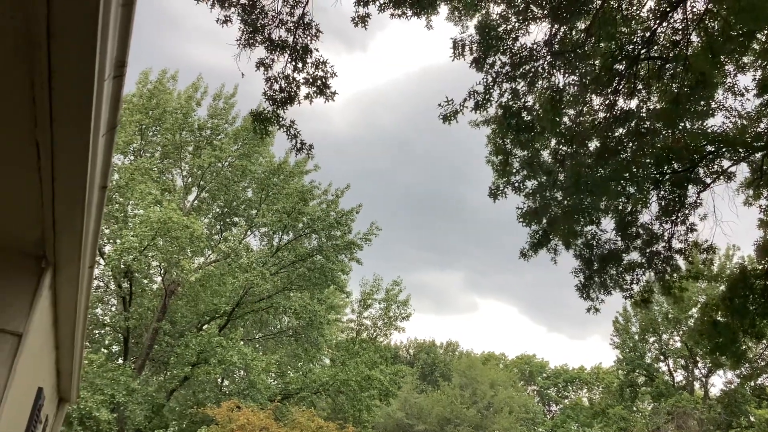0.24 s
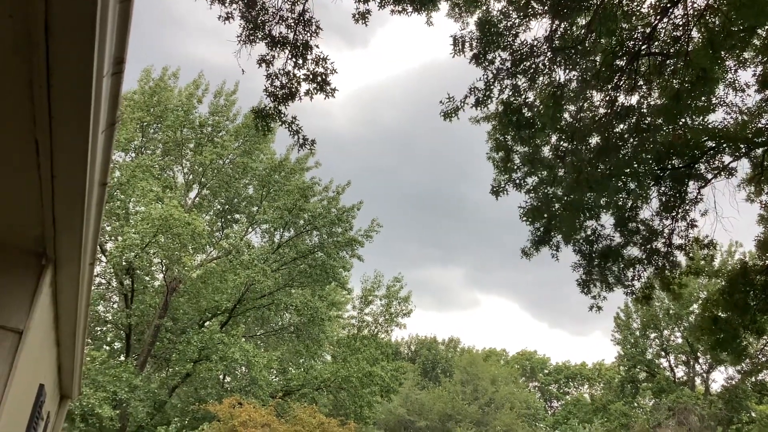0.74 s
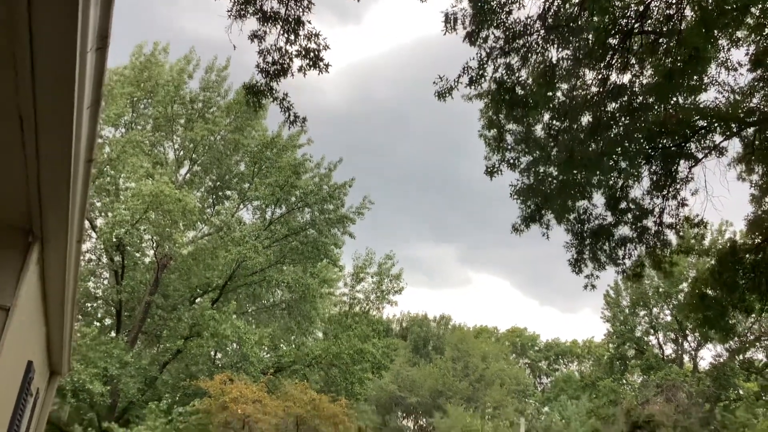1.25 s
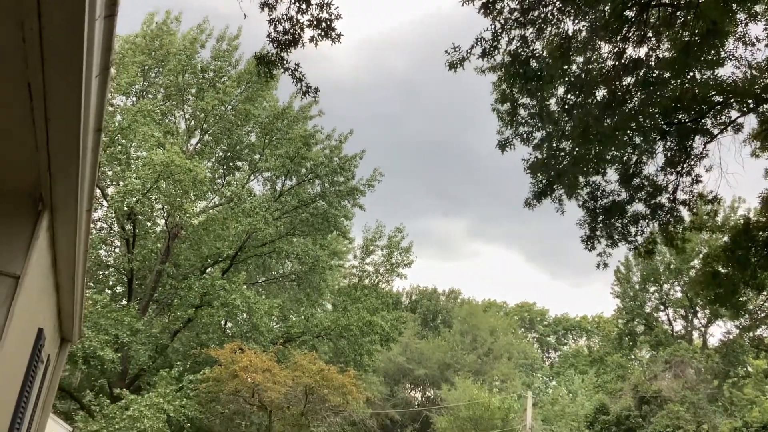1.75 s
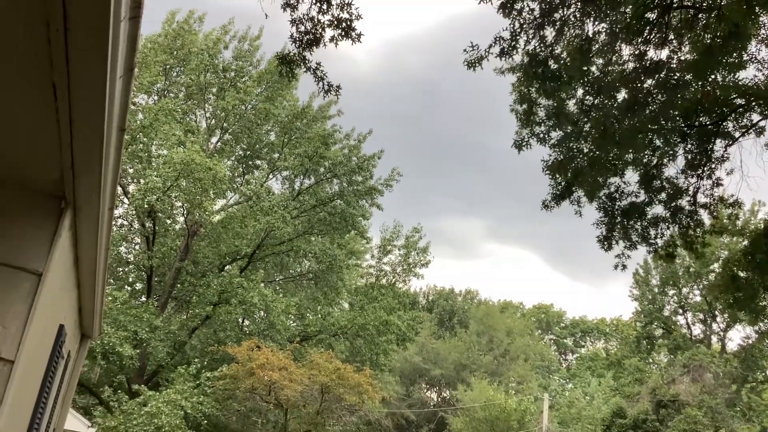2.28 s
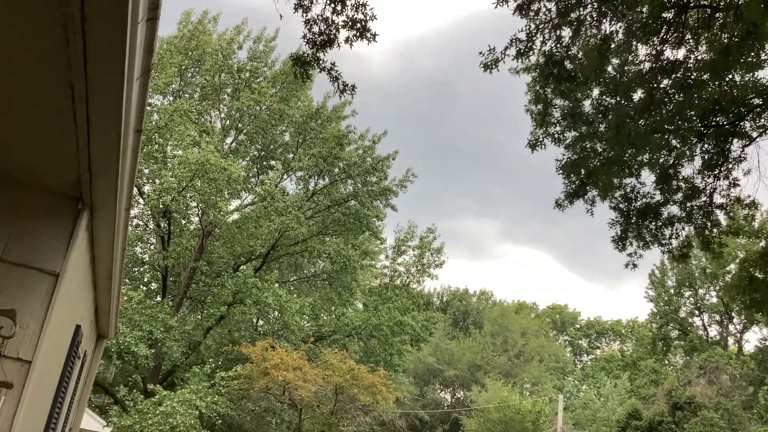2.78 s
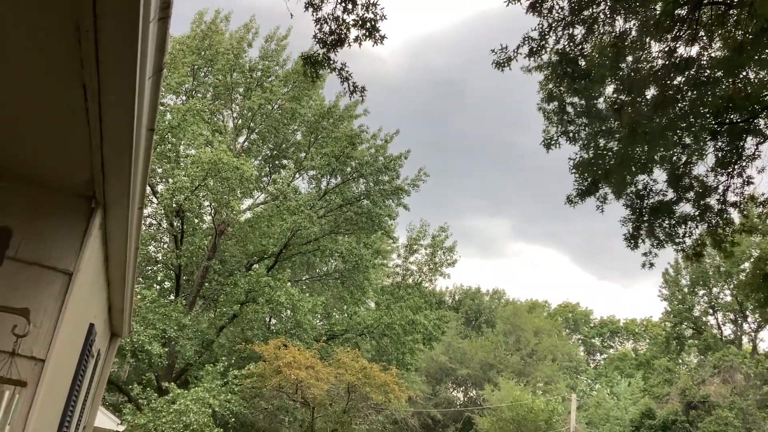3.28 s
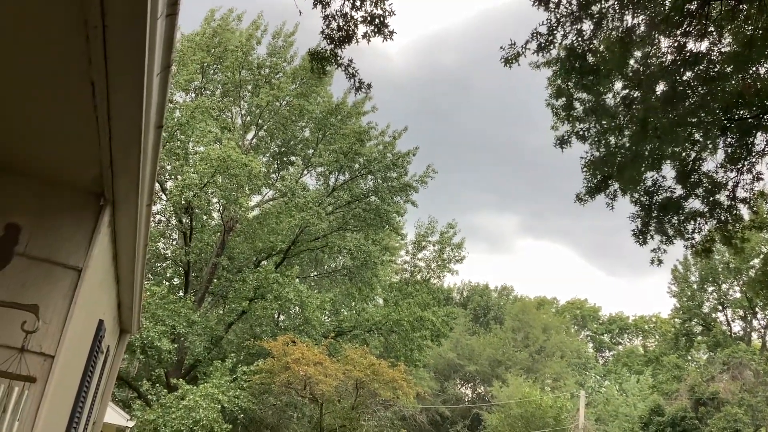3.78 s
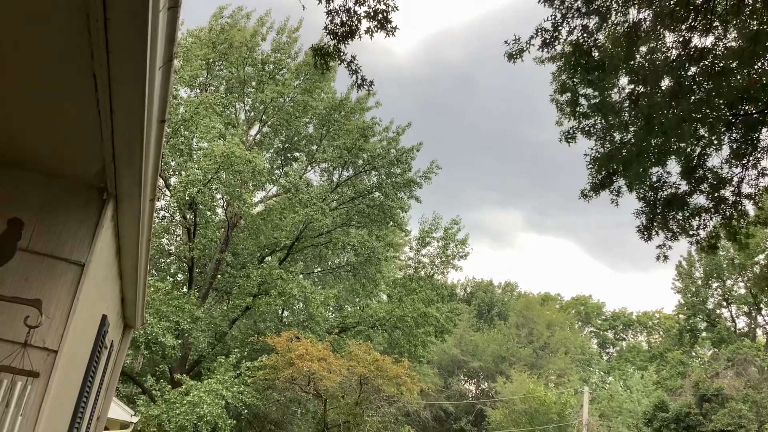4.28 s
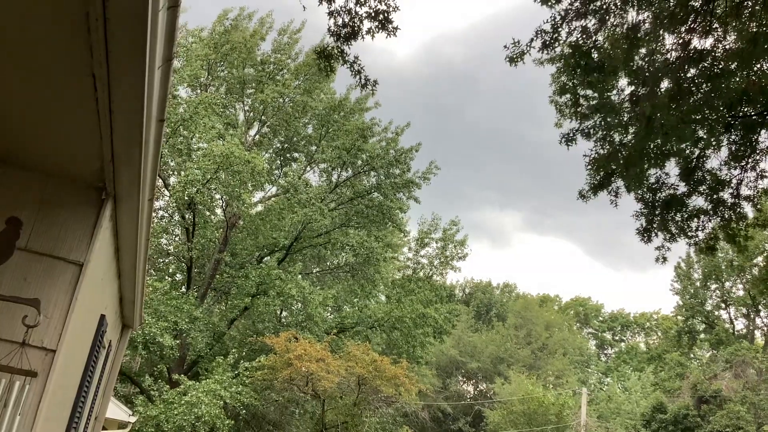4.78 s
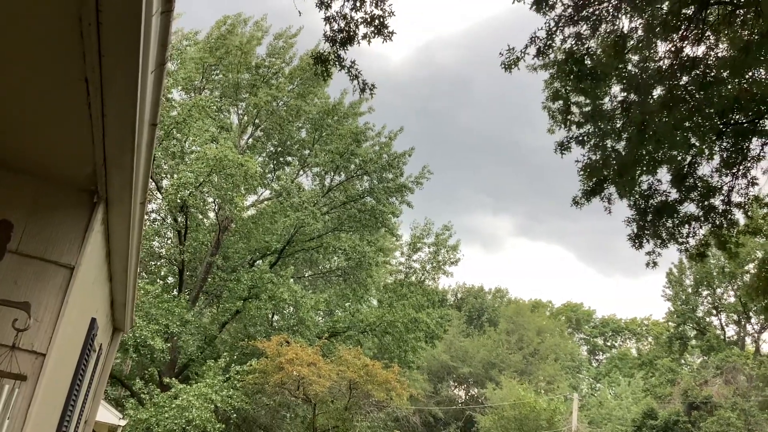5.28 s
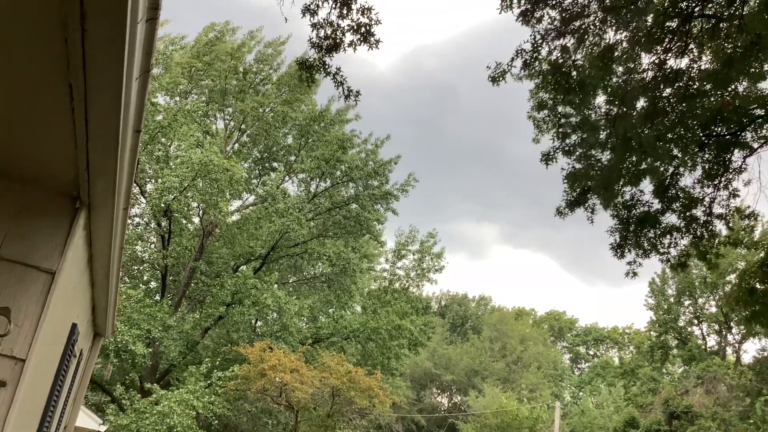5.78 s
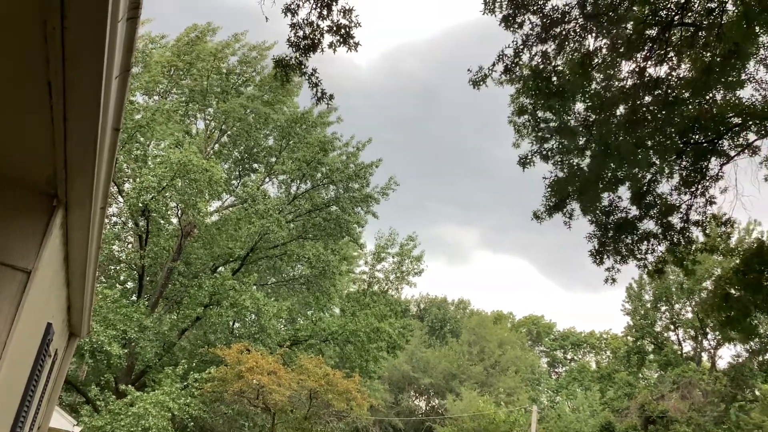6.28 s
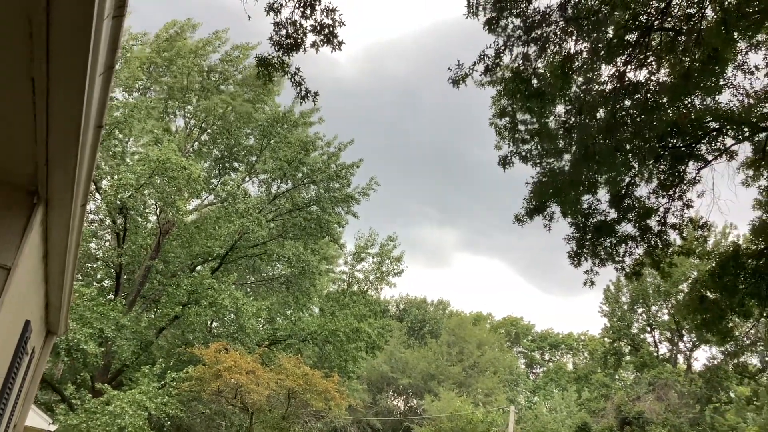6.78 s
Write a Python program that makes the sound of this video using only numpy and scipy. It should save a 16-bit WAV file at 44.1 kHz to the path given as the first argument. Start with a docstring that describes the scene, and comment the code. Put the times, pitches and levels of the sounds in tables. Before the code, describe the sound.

Outdoors under the eaves of a house among leafy trees, for about 7 seconds. From the start, wind makes a low uneven rumble with a hollow drone and soft moan, gusting at 0, 0.4 and 1 second, beneath a far tree roar and a smooth leaf hiss. A very thin, rapid cricket trill near the top of hearing's bright range stays faint throughout. At about 1.63 and 1.92 seconds, two hard, dry, millisecond clicks snap right at the microphone, with faint crackle, ticks and small bumps; the background drops abruptly after each and recovers over a fraction of a second. From 2.3 the foliage and trill are brighter. A gust rumbles at 3, leaves swell broadly at 3.7, and the far trees follow around 4.4. The trill weakens near 4.9, then returns. Gusts drone at 5 and 6.8, a barely audible thin whistle appears near 6, and rustling continues to the end.

```python
"""Under the eaves of a house among leafy trees: wind as a low rumble, a hollow drone and moan, a far roar.
Wind is shaped noise under gust envelopes; leaves are noise plus random contacts; hollows and whistles are sines.
A cricket trills thinly, one short sagging tone per wing stroke, over a chorus of narrow noise bands.
Two sharp clicks right at the microphone, with crackles, ticks and bumps, make the limiter duck everything."""
import sys
import numpy as np
from scipy import signal
from scipy.fft import rfft, irfft, next_fast_len
from scipy.io import wavfile
from scipy.ndimage import uniform_filter1d, minimum_filter1d

SR = 44100
rng = np.random.default_rng(int(sys.argv[2]) if len(sys.argv) > 2 else 0)


def transcribe(u):
    """Save the signal u as a 16-bit wav file named by the first command-line argument.

    u: samples, shape (n,) or (channels, n), limited to [-1, 1]; the rate is SR.
    q: integer samples, one column per channel.
    """
    v = np.clip(np.atleast_2d(u).T, -1, 1)
    q = np.round(v * 32767).astype(np.int16)
    wavfile.write(sys.argv[1], SR, q)


N = 310552
TIME = np.arange(N) / SR
FFT_SIZE = next_fast_len(N, True)
BINS_HZ = np.fft.rfftfreq(FFT_SIZE, 1 / SR)


def gain_of(db):
    """Decibels to an amplitude factor."""
    return 10 ** (np.asarray(db) / 20)


def evened(x):
    """Scales to an rms of 1."""
    return x / np.sqrt(np.mean(x ** 2) + 1e-20)


def spectrum_gain(points, hz):
    """Gain of a (frequency [Hz], level [dB]) table, interpolated on a log-frequency axis."""
    table_hz, table_db = np.transpose(points)
    return gain_of(np.interp(np.log(hz + 1), np.log(table_hz + 1), table_db))


def level_curves(table):
    """One gain curve for each level column."""
    s, *columns = np.transpose(table)
    return [gain_of(np.interp(TIME, s, column)) for column in columns]


def add(mix, s, sound):
    """Mixes a sound in from its start time."""
    part = mix[max(round(s * SR), 0):][:len(sound)]
    part += sound[:len(part)]


def coloured(x, gain):
    """Filters by a gain for each frequency bin; rms 1."""
    return evened(irfft(rfft(x, FFT_SIZE) * gain, FFT_SIZE)[:N])


def noise(gain):
    """Gaussian noise of a given spectrum; rms 1."""
    return coloured(rng.standard_normal(N), gain)


def wander(rate_hz):
    """Low-passed noise as a slow random drift; rms 1."""
    return noise(np.exp(-(BINS_HZ / rate_hz) ** 2))


def hump(hz, width_hz):
    """Bell-shaped gain of a resonance, height 1; the width is nominal."""
    return 1 / (1 + (2.36 * (BINS_HZ - hz) / width_hz) ** 2)


def swell(s, length_s):
    """Gaussian rise and fall, height 1 at its middle, down to exp(-2) one length away."""
    return np.exp(-2 * ((TIME - s) / length_s) ** 2)


def following(gain, db_per_db):
    """Gain that follows another about its mean level, more or less steeply."""
    mean_gain = np.exp(np.log(gain).mean())
    return (gain / mean_gain) ** db_per_db


def patchy(x, depth_db, bins):
    """Branches stir one by one: patches of the spectrum swell and fade for about a tenth of a second."""
    spectrogram = signal.stft(x, nperseg=1024, noverlap=768)[2]
    patches = uniform_filter1d(rng.standard_normal(spectrogram.shape), size=bins, axis=0)
    patches = evened(uniform_filter1d(patches, size=18, axis=1))
    stirred = signal.istft(spectrogram * gain_of(depth_db * patches), nperseg=1024, noverlap=768)[1]
    return evened(stirred[:N])


def ring(db, hz, t60_s, size=4096):
    """One exponentially dying mode."""
    t = np.arange(size) / SR
    return gain_of(db - 60 * t / t60_s) * np.sin(2 * np.pi * hz * t)


# gusts around the house, levels before the layer trims:
# (peak time [s], length [s], rumble level [dB], drone level [dB], moan level [dB])
GUSTS = [(0.025, 0.16, -46, -51.5, -49), (0.394, 0.41, -54, -52.5, -49.5), (0.995, 0.32, -50, -50, -51.5),
         (1.38, 0.31, -56, -55, -54.5), (2.647, 0.31, -54, -51, -54), (3.026, 0.26, -45, -51, -52),
         (3.546, 0.47, -62, -51.5, -71), (4.17, 0.18, -51, -59, -75), (4.79, 0.12, -47, -68, -72),
         (5.04, 0.29, -54, -48.5, -53.5), (5.53, 0.41, -49, -52, -65), (6.81, 0.32, -57, -49.5, -60),
         (7.031, 0.11, -46, -61, -70)]
# steady breeze before trims and surge: (time [s], far-tree roar level [dB], near-crown hiss level [dB])
BREEZE = [(0, -52, -58), (0.8, -52, -57.5), (1.25, -51, -58.5), (1.85, -51, -57.5), (2.3, -51, -53.5),
          (2.9, -50.5, -54.5), (3.6, -51, -54), (5, -50.5, -53), (5.5, -53.5, -53), (6.1, -54.5, -52.5),
          (7.04, -54.5, -52.5)]
# calm flow between gusts, before the layer trims
CALM_RUMBLE_DB, CALM_DRONE_DB, CALM_MOAN_DB = -50, -54.7, -59
# one broad surge crosses the near trees and reaches the far ones later
SURGE_S, SURGE_LENGTH_S, SURGE_TRAVEL_S = 3.72, 0.8, 0.66
SURGE_BOUGHS_DB, SURGE_CROWN_DB, SURGE_FAR_DB = 4.5, 2, 2


def wind_levels(unsteady_db=0.4):
    """Each gust adds its power to the calm flow; the rumble also drifts by itself."""
    power = gain_of([[CALM_RUMBLE_DB], [CALM_DRONE_DB], [CALM_MOAN_DB]]) ** 2
    for s, length_s, *db in GUSTS:
        power = power + np.outer(gain_of(db), swell(s, length_s)) ** 2
    rumble, drone, moan = np.sqrt(power)
    far_surge = swell(SURGE_S + SURGE_TRAVEL_S, SURGE_LENGTH_S)
    roar = level_curves(BREEZE)[0] * gain_of(SURGE_FAR_DB * far_surge)
    return rumble * gain_of(unsteady_db * wander(1.7)), drone, moan, roar


# spectral shapes of the wind layers: (frequency [Hz], relative level [dB])
RUMBLE_SPECTRUM = [(20, -60), (33, -38), (46, -24), (58, -4.5), (77, 2.5), (104, -5), (120, 0), (150, -8.5),
                   (200, -21.5), (400, -53), (1000, -81)]
DRONE_SPECTRUM = [(70, -36), (120, -8), (160, 5), (200, 1), (245, 1.5), (280, -6), (340, -17), (700, -59)]
MOAN_SPECTRUM = [(170, -40), (250, -13), (295, 1.5), (365, 0.5), (450, -4), (520, -1), (650, -4.5),
                 (1500, -55)]
ROAR_SPECTRUM = [(200, -8), (450, -8), (620, -1.5), (900, 3.5), (1150, 0), (1400, 0.5), (1770, -4),
                 (2100, -17.5), (4000, -15), (9000, -83)]
# resonances in drone and moan: (frequency [Hz], nominal width [Hz], gain before halving [dB])
HOLLOWS = [(235.4, 48, 9), (292, 20, 8), (354, 27, 4.5), (434, 38, 5.5)]


def wind():
    """Rumble, a hollow drone and moan that swell with the gusts, and the roar of the far trees."""
    rumble, drone, moan, roar = wind_levels()
    hollow = 1 + sum(gain_of(db) * hump(hz, width_hz) for hz, width_hz, db in HOLLOWS) / 2
    low = gain_of(-1.67) * rumble * noise(spectrum_gain(RUMBLE_SPECTRUM, BINS_HZ))
    droning = gain_of(-4.0) * drone * noise(hollow * spectrum_gain(DRONE_SPECTRUM, BINS_HZ))
    moaning = gain_of(-1.24) * moan * noise(hollow * spectrum_gain(MOAN_SPECTRUM, BINS_HZ))
    far_trees = patchy(noise(spectrum_gain(ROAR_SPECTRUM, BINS_HZ)), depth_db=0.73, bins=6)
    return low + droning + moaning + gain_of(-2.5) * roar * far_trees


# hollows sounded by gusts: (peak time [s], length [s], rms level before the swell [dB], frequency [Hz])
HOOTS = [(0.44, 0.12, -51, 359.4), (0.553, 0.06, -48.5, 108), (1.048, 0.061, -50, 168),
         (1.81, 0.061, -49.5, 103), (3.06, 0.081, -59, 356), (6.805, 0.073, -52, 231)]


def hoot(s, length_s, db, hz, waver_share=0.0239):
    """A hollow sounds a wavering note while a gust crosses it: a swelling sine with random pitch drift."""
    turns = np.cumsum(hz * (1 + waver_share * wander(29))) / SR
    return gain_of(db) * swell(s, length_s) * evened(np.sin(2 * np.pi * turns))


BOUGHS_DB, BOUGHS_DB_PER_DB = -60.5, 0.23  # boughs follow the far trees weakly
FIZZ_DB, FIZZ_DB_PER_DB = -74.5, 2.5  # nearest leaves follow the crown steeply


def leaf_levels():
    """Crown, boughs and nearest leaves follow the breeze; the surge lifts the heavy boughs most."""
    far, crown = level_curves(BREEZE)
    surge = swell(SURGE_S, SURGE_LENGTH_S)
    hiss = crown * gain_of(SURGE_CROWN_DB * surge)
    swish = gain_of(BOUGHS_DB + SURGE_BOUGHS_DB * surge) * following(far, BOUGHS_DB_PER_DB)
    fizz = gain_of(FIZZ_DB) * following(crown, FIZZ_DB_PER_DB)
    return hiss, swish, fizz


def rustle(spectrum, contacts_per_s):
    """Thousands of leaf contacts a second, a few larger, over the smooth wash of far foliage."""
    size = gain_of(2.2 * np.minimum(rng.exponential(1, N), 4)) * rng.choice([-1, 1], N)
    contacts = evened(size * (rng.random(N) < contacts_per_s / SR))
    wash = rng.standard_normal(N)
    return coloured(contacts + wash, spectrum_gain(spectrum, BINS_HZ))


# spectral shapes of boughs, crown and nearest leaves: (frequency [Hz], relative level [dB])
SWISH_SPECTRUM = [(800, -51), (1500, 4.5), (1850, 5.5), (2400, 2), (2900, -0.5), (4000, -8), (8000, -39)]
HISS_SPECTRUM = [(1200, -42), (2400, -11), (3100, -1), (3700, 3), (4550, 1.5), (5200, -2.5), (6000, -8.5),
                 (6900, -8), (7900, -16), (9000, -25), (12000, -43), (14000, -60)]
FIZZ_SPECTRUM = [(3000, -18), (6500, 1.5), (8000, 2.5), (9000, 1), (10000, -4), (12000, -10), (13500, -13),
                 (15000, -18)]


def leaves():
    """Heavy boughs swish, the crown hisses, the nearest leaves fizz."""
    hiss, swish, fizz = leaf_levels()
    boughs = swish * patchy(rustle(SWISH_SPECTRUM, contacts_per_s=6000), depth_db=1.65, bins=8)
    crown = patchy(rustle(HISS_SPECTRUM, contacts_per_s=8000), depth_db=1.0, bins=14)
    near = fizz * patchy(rustle(FIZZ_SPECTRUM, contacts_per_s=2700), depth_db=0.3, bins=24)
    return boughs + gain_of(-3.0) * hiss * crown + near


# light brushes, scuffs and ticks:
# (middle time [s], level before the swell [dB], length [s], centre [Hz], -6 dB width [Hz])
BRUSHES = [(.1, -65, 0.054, 9250, 4800), (0.25, -73, 0.045, 9600, 4600), (0.474, -70, 0.004, 10800, 2600),
           (1.004, -82, 0.05, 11700, 3000), (1.17, -85, 0.01, 11000, 3500),
           (1.015, -53, 0.0036, 3300, 3200), (2.26, -78, .06, 10400, 600), (2.32, -65.5, .16, 6500, 600),
           (2.62, -88, .13, 13400, 1200), (3.75, -62, .24, 4700, 2200), (3.9, -80, .08, 10000, 3500),
           (4.12, -85, 0.14, 13500, 1200), (5.808, -62.5, 0.0044, 9600, 2600)]


def brush(s, db, length_s, hz, width_hz, contacts_per_s=1500, wash_db=-5):
    """A soft swell of tiny random contacts over a noise wash, in one band."""
    band = np.exp(-((BINS_HZ - hz) / width_hz * 1.8) ** 4)
    contacts = evened(rng.standard_normal(N) * (rng.random(N) < contacts_per_s / SR))
    wash = gain_of(wash_db) * rng.standard_normal(N)
    return gain_of(db) * swell(s, length_s) * coloured(contacts + wash, band)


# sharp clicks and the faint ticks around them: (start time [s], snap peak [dB], pitch factor of the colour,
# tilt [dB/octave], case knock frequency [Hz], ring offset [dB])
CLICKS = [(1.6243, -26.5, 0.84, -1, 720, -6), (1.6308, 2.5, 0.93, 0.5, 730, -10),
          (1.6357, -35, 0.84, -3, 720, -6), (1.6603, -47, 1.1, 16, 720, -6),
          (1.9015, -29.5, 0.99, 4, 560, -4), (1.9123, -28, 1.1, 3, 555, -2), (1.918, -31, 0.94, 2, 555, 0),
          (1.9228, 5.5, 0.92, 4.5, 565, -10), (1.9345, -34, 1.0, 2, 555, 0),
          (1.9438, -33.5, 0.88, 5, 560, -4)]
# spectral shape of a snap: (frequency [Hz], relative level [dB])
CLICK_COLOUR = [(40, -46), (130, -12), (270, -6), (500, -7), (950, 8.5), (1500, 12.5), (2000, 12.5),
                (2500, 8.5), (2850, 12), (3500, 10), (4200, 7.5), (4900, -0.5), (6800, -8), (9200, -15.5),
                (10400, -22), (11900, -21), (13500, -24), (15000, -27), (16000, -39)]
# faint high ringing after each click: (frequency [Hz], level re snap before ring offset [dB], t60 [s])
CLICK_RINGS = [(2610, -29, 0.0085), (4670, -40, 0.032), (5960, -27, 0.024)]


def click(peak_db, pitch, tilt_db_per_octave, knock_hz, ring_db,
          knock_db=-30, knock_t60_s=0.03, scatter_db=-53, scatter_t60_s=0.05, size=4096):
    """A snap about a millisecond long, a knock of the case, a high ring, faint scatter from wall and eaves."""
    hz, t = abs(np.fft.fftfreq(size, 1 / SR)), np.arange(size) / SR
    tilt = gain_of(tilt_db_per_octave * np.log2(hz / 2500 + 0.048))  # offset keeps 0 Hz finite
    log_gain = np.log(spectrum_gain(CLICK_COLOUR, hz / pitch) * tilt)
    # minimum phase: nothing sounds before the contact
    snap = np.fft.ifft(np.exp(np.conj(signal.hilbert(log_gain)))).real
    knock = gain_of(knock_db - 60 * t / knock_t60_s) * np.cos(2 * np.pi * knock_hz * t)
    echoes = evened(signal.fftconvolve(rng.standard_normal(size), snap)[:size])
    scatter = gain_of(scatter_db - 60 * t / scatter_t60_s) * echoes
    high_ring = sum(ring(db + ring_db, ring_hz, t60_s, size=size) for ring_hz, db, t60_s in CLICK_RINGS)
    return gain_of(peak_db) * (snap / abs(snap).max() + knock + high_ring + scatter)


# faint grainy crackle rising just before each click: (start time [s], length [s], rms level [dB], pitch factor)
CRACKLES = [(1.6207, 0.0081, -37, 0.99), (1.912, 0.0113, -36, 1.02)]
# spectral shape of a crackle: (frequency [Hz], relative level [dB])
CRACKLE_COLOUR = [(120, 2), (330, 5), (430, 5), (560, 12), (760, 7), (1500, -10), (2600, 1.5), (4500, -4),
                  (5500, -11), (6200, -1), (6900, -4), (7800, -2.5), (9300, -39), (14000, -36)]


def crackle(length_s, db, pitch, grains_per_s=7000, rise_db=8):
    """Random grains swell in a coloured burst of noise."""
    grains = rng.standard_normal(N) * (rng.random(N) < grains_per_s / SR)
    grit = coloured(grains, spectrum_gain(CRACKLE_COLOUR, BINS_HZ / pitch))[:int(length_s * SR)]
    growth = gain_of(np.linspace(0, rise_db, len(grit)))
    return gain_of(db) * evened(grit * signal.windows.tukey(len(grit), .15) * growth)


# the case settles after each click: (start time [s], level [dB])
BUMPS = [(1.6423, -27), (1.935, -31)]
# ringing of each bump: (frequency [Hz], level re bump [dB], t60 [s])
BUMP_MODES = [(139, -1, 0.022), (368, -6, 0.027)]


def bump(db):
    """A soft bump of the settling case: a sum of low dying modes."""
    return sum(ring(db + mode_db, hz, t60_s) for hz, mode_db, t60_s in BUMP_MODES)


# common level of near and far crickets: (time [s], level [dB])
TRILL = [(0, -67), (1.25, -68.5), (1.45, -66), (1.95, -66.5), (2.35, -60.5), (3.7, -61), (4.85, -65),
         (5.4, -60.5), (7.04, -62.5)]
# far crickets: (frequency [Hz], nominal width [Hz], level re TRILL [dB])
CHORUS = [(7260, 340, -8), (6820, 130, -14), (7250, 580, -4)]


def crickets(pitch_hz=7350, fall_hz=110, stroke_share=0.26, strokes_per_s=44.28, near_db=-3):
    """Each wing stroke is a fresh short tone that sags as the wing slows; far crickets blur into a band."""
    strokes = strokes_per_s * TIME + 0.019 * wander(8)
    within = strokes % 1 - .5  # -0.5 to 0.5, loudest at 0
    hz = pitch_hz - 2 * fall_hz * np.maximum(within, 0) + 18 * wander(71.0)
    start_phase = rng.random(N)[np.floor(strokes).astype(int)]
    turns = np.cumsum(hz) / SR + start_phase
    stroke = np.exp(-(within / stroke_share) ** 2) * gain_of(2.0 * wander(25))
    near = evened(stroke * np.sin(2 * np.pi * turns))
    far = sum(gain_of(db) * noise(hump(band_hz, width_hz)) for band_hz, width_hz, db in CHORUS)
    return level_curves(TRILL)[0] * (gain_of(near_db) * near + far)


# very thin high whistle, perhaps an insect:
# (start time [s], length [s], rms level [dB], start [Hz], middle [Hz], end [Hz])
WHISTLES = [(5.77, .055, -81, 13450, 13170, 13100), (5.912, .055, -82.5, 13200, 13420, 13600),
            (5.995, .09, -78, 13420, 13180, 13420), (6.165, .04, -88, 13550, 13280, 12950)]


def whistle(length_s, db, *pitches_hz):
    """A sine that bends along a parabola through three pitches."""
    u = np.linspace(0, 1, int(length_s * SR))
    hz = np.polyval(np.polyfit([0, .5, 1], pitches_hz, 2), u)
    tone = np.sin(2 * np.pi * np.cumsum(hz) / SR)
    return gain_of(db) * evened(signal.windows.tukey(len(u), .5) * tone)


def scene():
    """All sources at one microphone."""
    mix = wind() + sum(hoot(*row) for row in HOOTS)
    mix = mix + leaves() + sum(brush(*row) for row in BRUSHES) + crickets()
    for table, source in [(CLICKS, click), (CRACKLES, crackle), (BUMPS, bump), (WHISTLES, whistle)]:
        for s, *row in table:
            add(mix, s, source(*row))
    return mix[None]


CEILING_DB, SELF_NOISE_DB, EDGE_HZ = -1.0, -87, 14900  # self-noise before the band limit


def record(dry, recovery_db_per_s=58, hold_s=0.062, bass_hz=480):
    """A limiter ducks on peaks, most in the bass, holds and recovers; then steady hiss and the band limit."""
    over_db = np.maximum(20 * np.log10(abs(dry[0]) + 1e-9) - CEILING_DB, 0)
    ahead_db = -minimum_filter1d(-over_db, size=200)  # running maximum
    half = int(hold_s * SR / 2)
    held_db = -minimum_filter1d(-ahead_db, size=2 * half + 1, origin=half)
    fall_db = TIME * recovery_db_per_s
    duck_db = uniform_filter1d(np.maximum.accumulate(held_db + fall_db) - fall_db, size=100)
    # extra bass reduction, smoothed over 3001 samples
    bass_db = uniform_filter1d(duck_db, size=3001, origin=1500)
    bass = signal.sosfiltfilt(signal.butter(2, bass_hz, fs=SR, output="sos"), dry)
    ducked = (dry - bass + bass / gain_of(bass_db)) / gain_of(duck_db)
    hiss = gain_of(SELF_NOISE_DB) * rng.standard_normal(N)
    low_pass = signal.firwin(511, EDGE_HZ, window=("kaiser", 9), fs=SR)
    return signal.oaconvolve(ducked + hiss, low_pass[None], "same")


dry = scene()
out = record(dry)
transcribe(out)
```